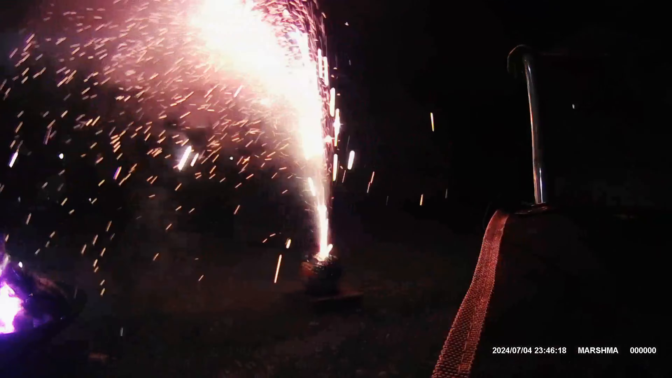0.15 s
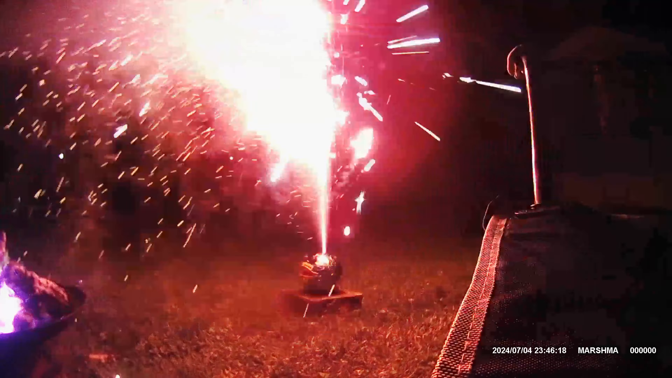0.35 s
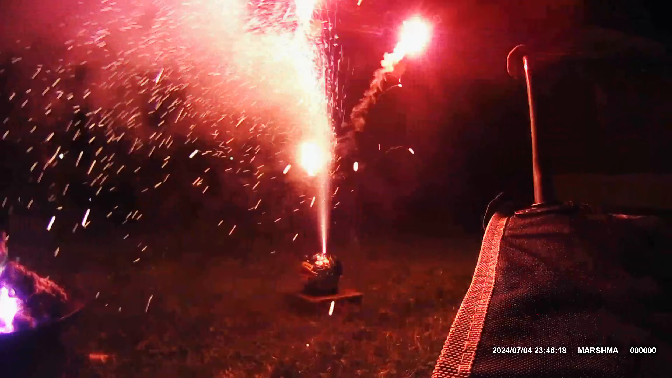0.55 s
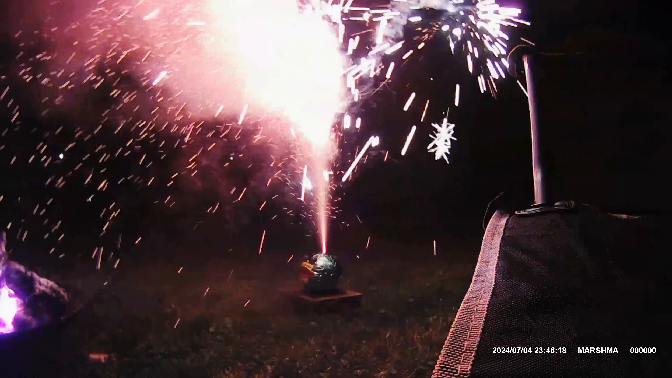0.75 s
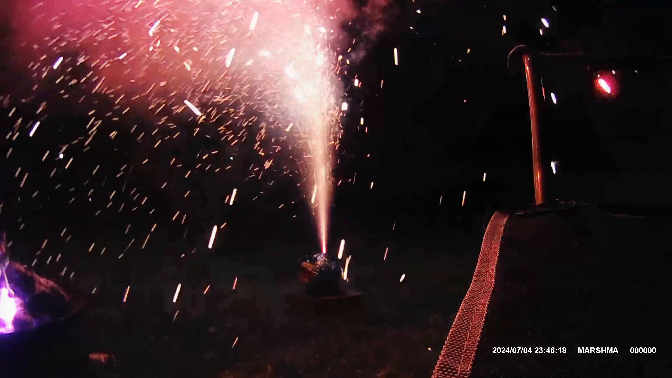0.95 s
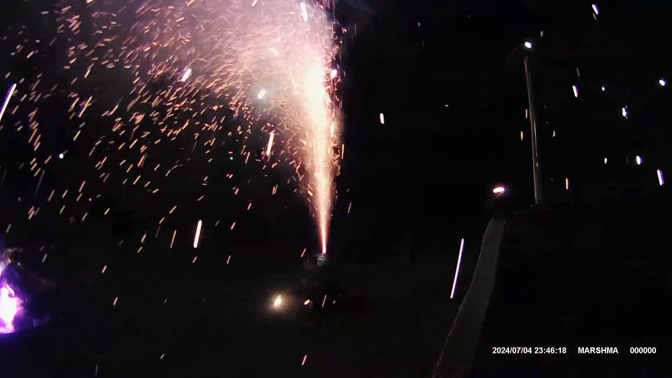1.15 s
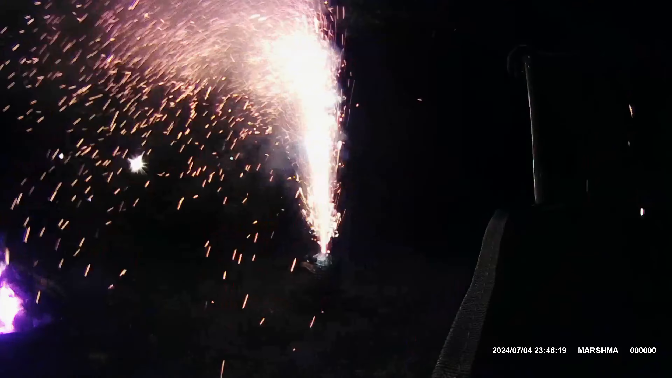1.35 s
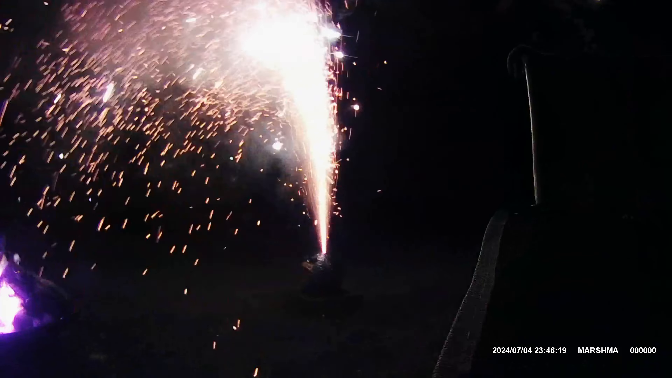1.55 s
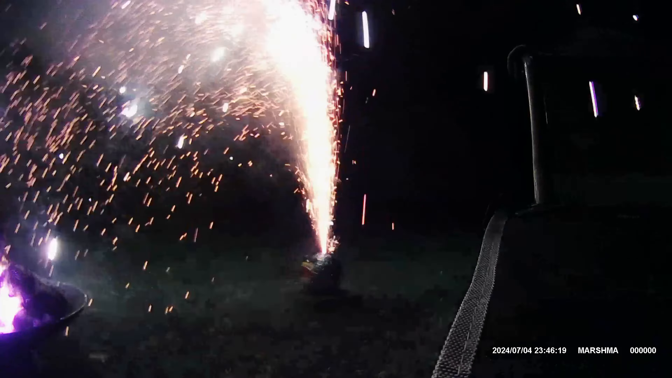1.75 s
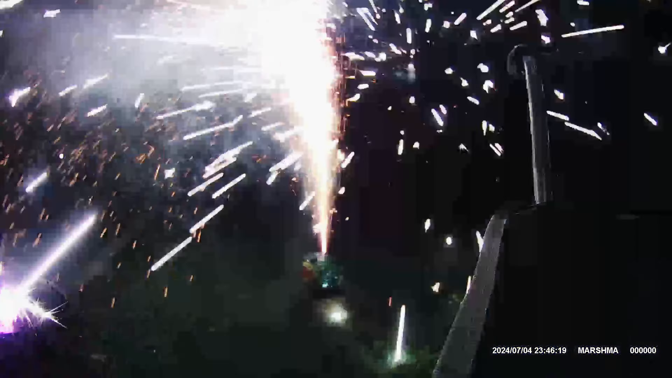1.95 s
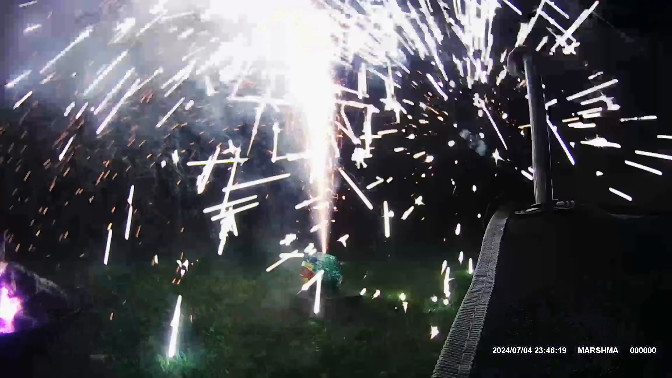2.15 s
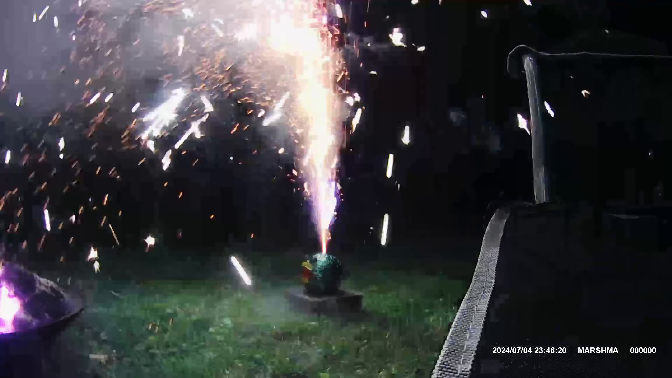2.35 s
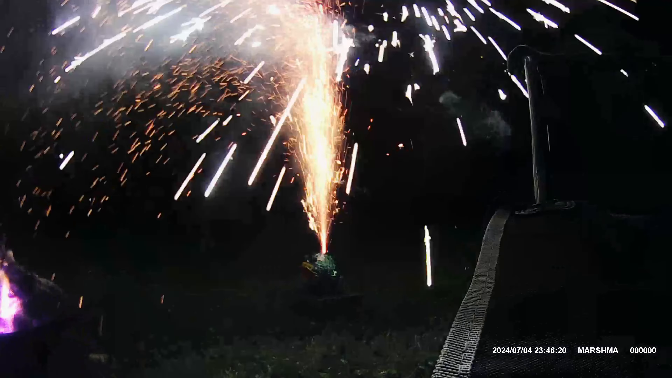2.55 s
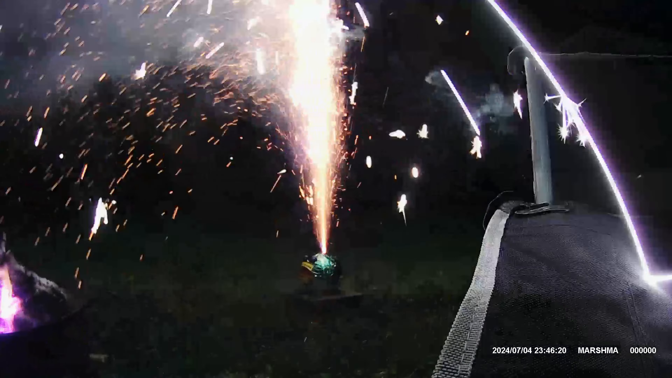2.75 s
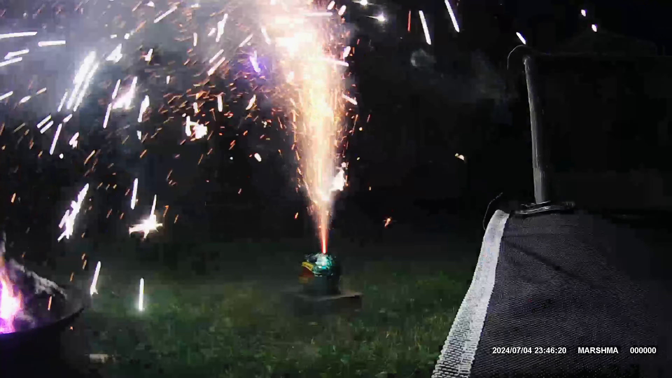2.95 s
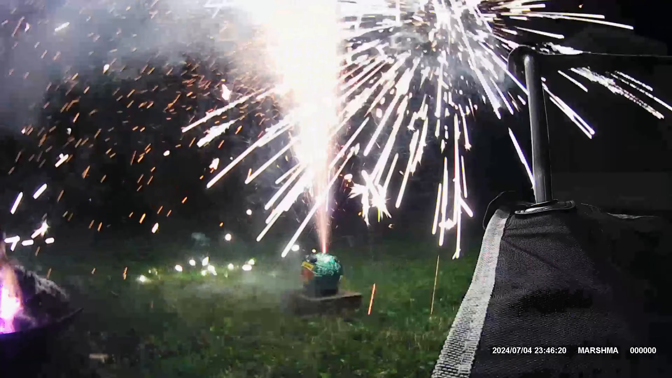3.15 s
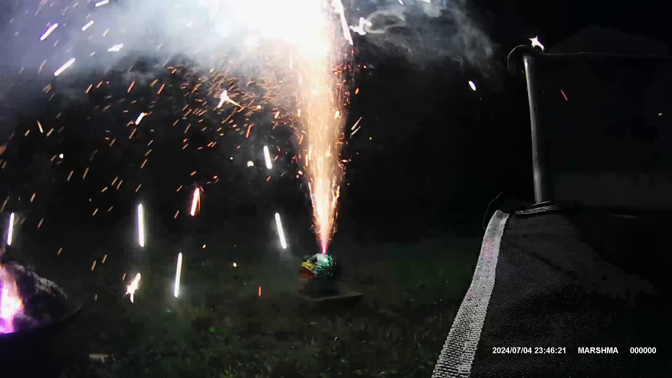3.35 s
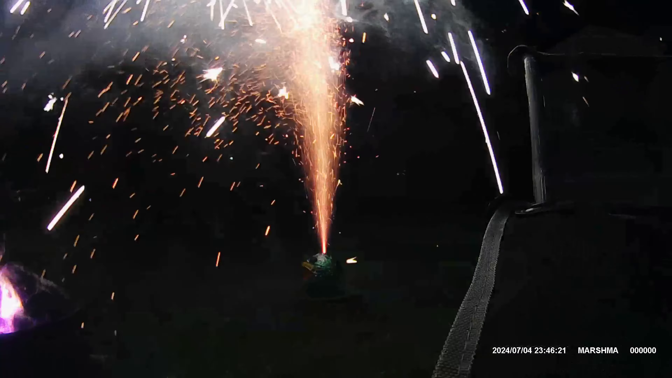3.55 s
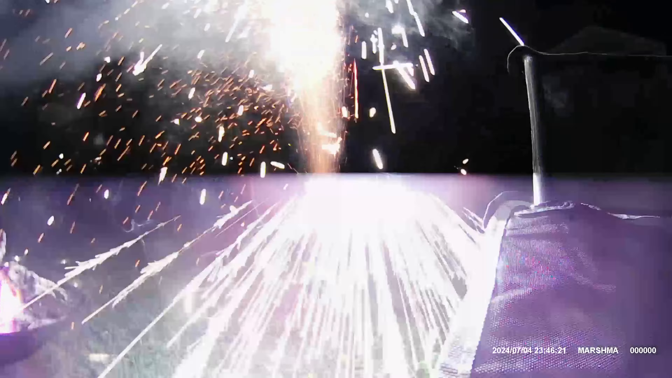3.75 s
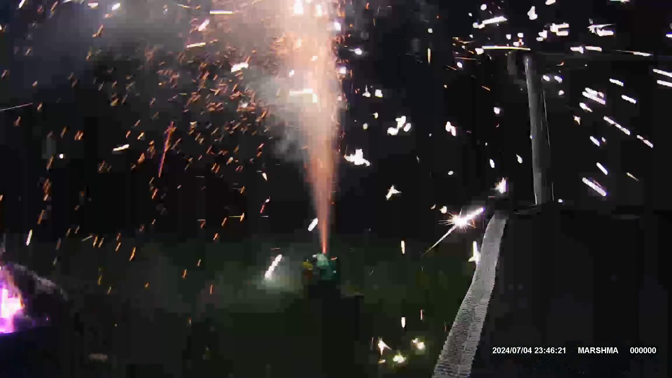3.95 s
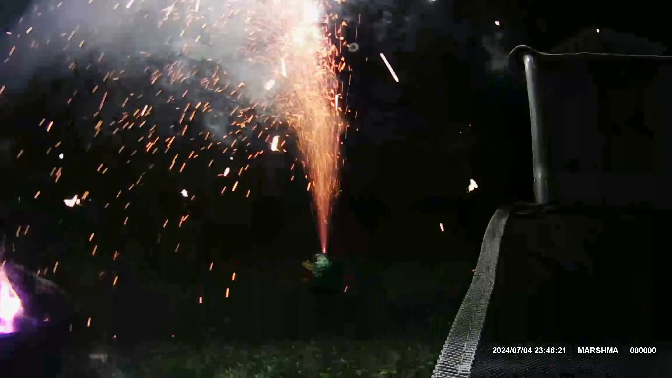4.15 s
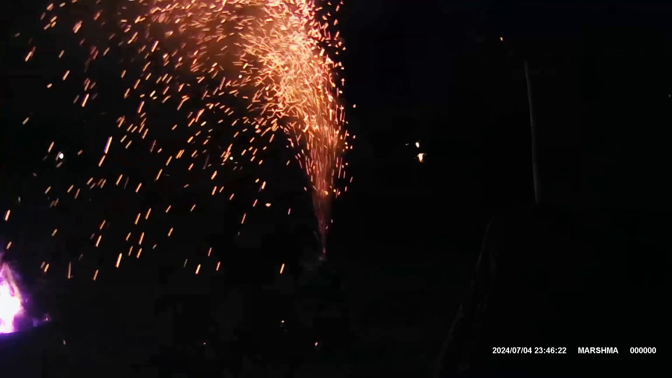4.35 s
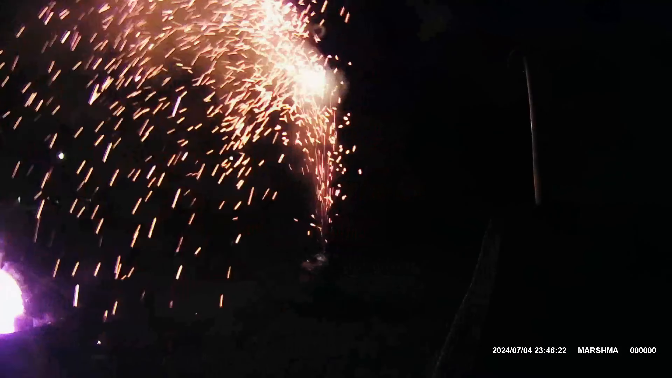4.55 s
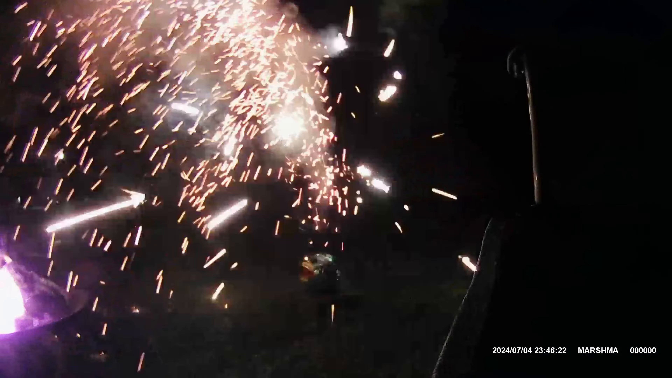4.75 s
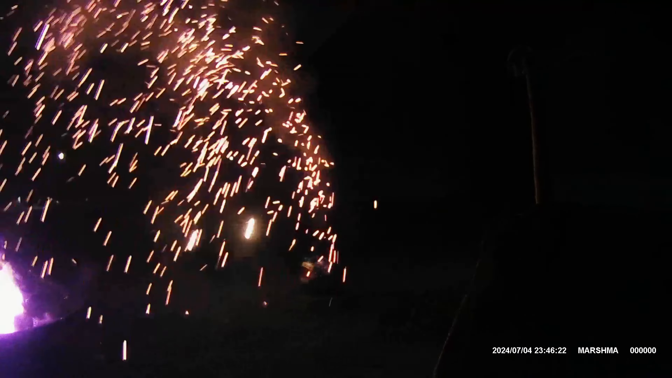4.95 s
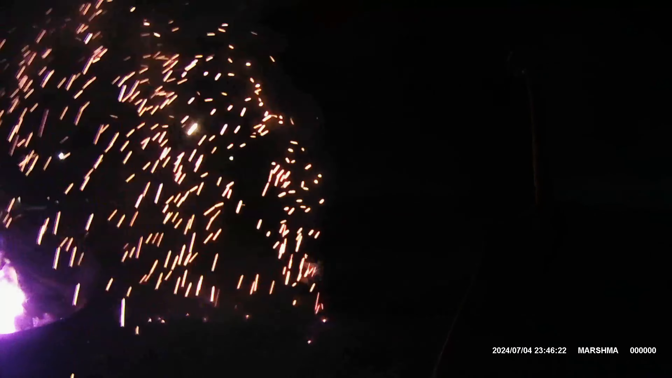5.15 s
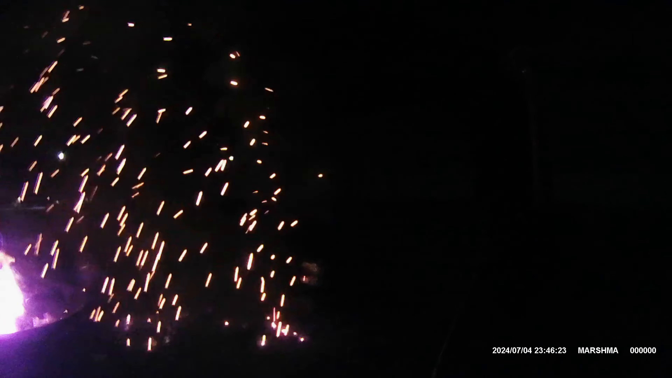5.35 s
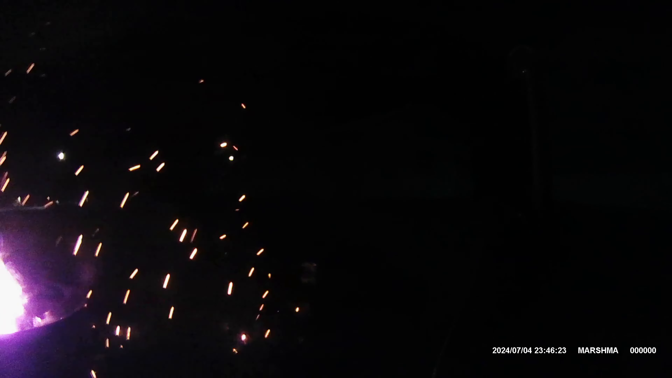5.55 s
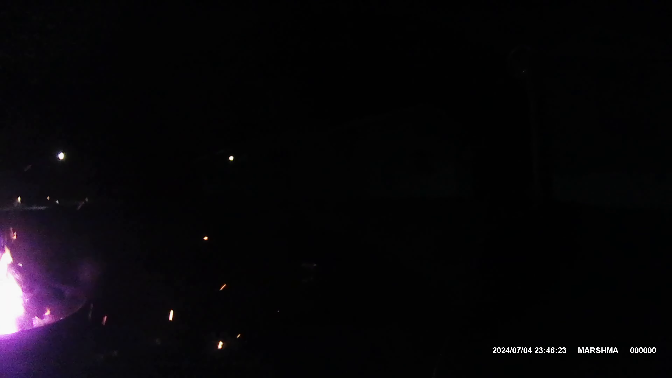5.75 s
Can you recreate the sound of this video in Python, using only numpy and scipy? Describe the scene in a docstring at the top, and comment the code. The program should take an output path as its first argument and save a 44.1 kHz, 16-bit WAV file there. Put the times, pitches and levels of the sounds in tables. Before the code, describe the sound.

A close, mono, overloaded camera microphone catches a firework fountain on a lawn. First come irregular dry cracks over a steady hiss, then dense, loud, distorted crackling with heavy punches. After about four seconds the bursts cease, the hiss collapses, a single weaker pop follows, and a thin high sizzle dies into quiet rumble.

```python
"""A ground fountain firework burns on a lawn at night: its stars open with N-shaped shocks and spit noise,
the nearest bursts add a suction that drives the microphone to its rail, and a turbulent hiss swells and dies.
Embers sizzle on as thin high noise after the hiss has sunk. Echoes die away over the garden as noise driven
by the power of the bursts, above a low lumpy rumble and an even hush. A small camera a few metres away
overloads, adds two faint throbbing tones and cuts the top treble."""
import sys
import numpy as np
from scipy import signal
from scipy.fft import rfft, irfft
from scipy.io import wavfile

SR = 44100
rng = np.random.default_rng(int(sys.argv[2]) if len(sys.argv) > 2 else 0)


def undo_db(level):
    """Turn decibels back into plain size, where 20 dB means ten times bigger."""
    steps = np.asarray(level, float) / 20
    return 10 ** steps


def dump_mix(stems):
    """Bounce the given channels to the path in sys.argv[1] as a 16-bit WAV at rate SR."""
    frames = np.atleast_2d(stems).T  # one column per channel
    limited = np.clip(frames, -1, 1)  # hard clip at full scale
    pcm = np.round(limited * 32767).astype(np.int16)
    wavfile.write(sys.argv[1], SR, pcm)


N = 260190   # length [samples]
MIC_RAIL = 2.67   # height at which the capsule limits, linear


def rms_one(x):
    """Normalisation: scales a signal to unit effective value."""
    return x / np.sqrt(np.mean(x ** 2) + 1e-20)


def butter(x, hz, kind, order=2):
    """Butterworth filtering: a maximally flat pass band."""
    return signal.sosfilt(signal.butter(order, hz, kind, fs=SR, output="sos"), x)


def drift(rate_hz):
    """Low-passed chance: two equal poles at rate_hz leave a slow wander of spread 1."""
    pole = np.exp(-80 * np.pi * rate_hz / SR)   # one step every 40 samples
    chance = rng.standard_normal(N // 40 + 2002)
    slow = signal.lfilter([1], [1, -2 * pole, pole * pole], chance)[2000:]
    return np.interp(np.arange(N) / 40, np.arange(len(slow)), rms_one(slow))


def coloured(spectrum):
    """Spectral shaping: white noise weighted along log frequency, with unit effective value."""
    hz, db = np.transpose(spectrum)
    grid = np.maximum(np.fft.rfftfreq(N, 1 / SR), 1)
    weight = undo_db(np.interp(np.log(grid), np.log(hz), db))
    return rms_one(irfft(rfft(rng.standard_normal(N)) * weight, N))


def dying(x, t60):
    """Exponential decay: values fall by a factor of 1000 in t60 [s]; a steady input keeps its height."""
    pole = undo_db(-60 / (t60 * SR))
    return signal.lfilter([1 - pole], [1, -pole], x + 1e-18)


def in_time(rows):
    """Linear interpolation: the columns of a curve, sample by sample."""
    s, *columns = np.transpose(rows)
    return [np.interp(np.arange(N) / SR, s, column) for column in columns]


# Crackling stars: (time [s], level [dB], time to burn down 6 dB [ms])
STAR_BURSTS = [(0.2069, 5.5, 2), (0.2192, -24, 6), (0.249, -10, 2), (0.257, -19, 5), (0.2927, -6, 1.84),
               (0.3703, -3, 4), (0.3941, -13.5, 3), (0.4493, -17, 2), (0.495, -23, 0.7),
               (0.577, -11.5, 1.8), (0.599, -22, 3.5), (0.6724, -21, 2.1), (0.7087, -17, 1.9),
               (0.7198, -22, 1.1), (0.7735, -7.5, 6.5), (0.7933, 8, 2), (0.831, -18.5, 1.1),
               (0.9219, -10, 1.86), (0.9842, -3.5, 1.5), (1.0113, -14.5, 2.5), (1.0675, -9.5, 1),
               (1.26, -22.5, 2.2), (1.4, -17, 2), (1.4049, -9, 1.8), (1.453, -20.5, 2.5),
               (1.4938, -24, 0.2), (1.6116, -6, 3.5), (1.6581, -16.5, 1.9), (1.7115, 10.5, 2),
               (1.792, -1.5, 5.5), (1.8146, -11.5, 6), (1.8245, 10, 5.5), (1.832, 7, 5.5), (1.9, 10, 9.5),
               (1.9368, 0, 6.5), (1.9733, -1, 5.0), (2.017, -14, 4.0), (2.027, -8.5, 5.5), (2.09, 0.5, 5.5),
               (2.1281, 3, 3), (2.137, -1.2, 4.5), (2.1465, -5, 1.5), (2.1819, 5, 2), (2.2413, 13, 2.5),
               (2.2613, 6, 2), (2.3052, -2, 10), (2.3192, -1, 5.5), (2.3353, 4.5, 3.5), (2.39, -9.5, 7.5),
               (2.3948, 11.5, 4.5), (2.4405, -16.5, 6), (2.4595, 9, 3.5), (2.5037, -13, 8.5),
               (2.5066, 9.5, 5.5), (2.568, -14.5, 1.8), (2.6058, -8.5, 3.5), (2.669, 14, 3),
               (2.706, 8.5, 3.5), (2.719, 6, 6), (2.731, 12, 2), (2.7771, -1.1, 8), (2.8045, 5, 4.5),
               (2.8146, 2.5, 5), (2.8248, -6, 5.5), (2.8403, 5.5, 2), (2.8714, 8, 2.5), (2.8875, 5, 9),
               (2.894, 2, 9), (2.9207, 3, 4.0), (2.948, -12, 0.1), (2.9794, 3.5, 1.8), (2.999, 3.5, 4),
               (3.013, 10.5, 7), (3.0799, 9.5, 4.5), (3.087, 1, 7.5), (3.106, -11, 2.4), (3.1268, 3, 8.5),
               (3.153, 11, 3.5), (3.1673, 7, 7.5), (3.1932, -7, 4.2), (3.247, 4.5, 7), (3.2514, 7.5, 1.5),
               (3.276, 9, 3.3), (3.3054, 4, 3.5), (3.3332, 5, 2.5), (3.359, 10, 8), (3.369, 1.5, 4.5),
               (3.386, 1.5, 5.5), (3.4111, -2.5, 4), (3.433, 15, 8.5), (3.4517, 6.5, 7), (3.469, -15, 0.5),
               (3.49, 6.5, 10), (3.5158, 3.5, 9), (3.546, 5.5, 4), (3.6115, 8, 4), (3.626, -15, 1),
               (3.6597, 2, 5), (3.6704, 5, 6), (3.6792, -5.5, 3.5), (3.7174, -9.5, 3.5), (3.7253, -2, 4),
               (3.737, 15.5, 3.5), (3.7627, 2.5, 6), (3.7834, -5, 2.3), (3.7905, -6.5, 4),
               (3.8058, 1.5, 0.6), (3.8233, 9, 4.5), (3.8676, 18.5, 4), (3.88, 4, 3), (3.9038, -1.5, 8),
               (3.9333, 7.5, 5.5), (3.9516, 7.5, 3.5), (3.9676, 10, 1.5), (3.979, 3, 5.5),
               (3.9948, 11.5, 2.5), (4.0508, 2.5, 5), (4.0671, 3, 2.5), (4.074, -5.5, 3.5),
               (4.086, -2, 4.5), (4.1022, 0.5, 5.0), (4.165, 1.5, 10.5), (4.208, -15, 11), (4.21, 15, 2.5),
               (4.254, -17, 2.5), (4.2783, -10.5, 1), (4.3113, -22.5, 4.5), (4.3203, -8, 1.1),
               (4.7119, -10.5, 2.5), (4.8241, -43, 1.6), (4.8694, -42, 1.45)]
# Muffled pops, mostly body: (time [s], level [dB], time to burn down 6 dB [ms])
MUFFLED_POPS = [(0.112, -35.5, 3.2), (0.1734, -19, 3.6), (0.585, -25.5, 3.1), (0.9875, -20, 1.9),
                (1.6114, -2, 2.3)]


def bursts():
    """Superposition: stars, pops and random splinters as rows of (s, level dB, burn ms, dull dB)."""
    s, level_db, burn_ms = np.transpose(STAR_BURSTS)
    # dull part of a star over its bright part: typical dB, dB per dB of level, chance spread dB
    typical_db, per_level_db, dull_spread_db = -8.5, -0.0232, 2
    dull_db = typical_db + per_level_db * level_db + dull_spread_db * rng.standard_normal(len(s))
    stars_rows = list(zip(s, level_db, burn_ms, dull_db))
    pops_rows = [(*pop, 6) for pop in MUFFLED_POPS]

    over_hiss_db, size_spread_db, snap_ms, snap_dull_db = 5, 3.5, .6, -2.5
    hiss_db, splinters_per_s = in_time(HISS_COURSE)
    snapped = np.flatnonzero(rng.random(N) < splinters_per_s / SR)
    sizes_db = hiss_db + over_hiss_db + size_spread_db * rng.standard_normal(N)
    splinters = [(i / SR, sizes_db[i], snap_ms, snap_dull_db) for i in snapped]
    return stars_rows + pops_rows + splinters


def spitting(length):
    """Random amplitude modulation: white noise whose level jumps every 12 samples, in one shared volley."""
    steps = undo_db(4 * rng.standard_normal(length // 12 + 1)).repeat(12)[:length]
    return lambda: steps * rng.standard_normal(length)


def stars(split_hz=2500, top_hz=14000):
    """N-wave and noise burst: a shock, then a spitting volley; each burst leaves a short fading tail."""
    burn_shape, tail_db, tail_t60_s = 1.81, -18, 0.056
    length = 8000   # of one burst [samples]
    out, t = np.zeros(N + length), np.arange(length) / SR
    spit = spitting(N)
    dull = rms_one(butter(spit(), [300, split_hz], "band"))
    bright = rms_one(butter(butter(spit(), top_hz, "low", order=1), split_hz, "high"))
    thin = rms_one(butter(spit(), [1700, 2900], "band"))
    dull, thin, bright = (np.pad(v, (0, length)) for v in (dull, thin, bright))
    for s, level_db, burn_ms, dull_db in bursts():
        burnt = t * 1000 / burn_ms
        shape = undo_db(-6 * burnt ** burn_shape) + undo_db(tail_db - 60 * t / tail_t60_s)
        wave_s = 0.00007 * undo_db(dull_db / 2)   # a duller star has a longer shock
        shock = undo_db(9) * (1 - 2 * t / wave_s) * (t < wave_s)
        at = slice(round(s * SR), round(s * SR) + length)
        body = thin if burn_ms < 1.75 else dull   # a brief snap is too small to make bass
        volley = bright[at] + undo_db(dull_db) * body[at]
        out[at] += undo_db(level_db) * (shock + shape * volley)
    return out[:N]


# Low pressure blows of near bursts, and two distant thumps at the end:
# (time [s], suction over the rail [dB])
PRESSURE_BLOWS = [(0.1142, -23.5), (0.1734, -12), (0.247, -22), (0.2753, -21.5), (0.393, -23),
                  (0.5863, -18.5), (0.6622, -21.5), (0.7087, -24.5), (0.7718, -12.5), (0.791, -19),
                  (0.988, -19.5), (1.4017, -22), (1.613, -12.5), (1.7104, -24), (1.8053, 28.5), (1.8284, 6),
                  (1.899, -0.5), (1.9366, 10.5), (1.9716, -11), (2.0224, 15.5), (2.091, -13.5),
                  (2.1253, 15), (2.1406, 12), (2.3034, 1.5), (2.393, 8), (2.4592, 0), (2.5997, 20.5),
                  (2.705, 1), (2.7748, -6.5), (2.888, -4), (2.9811, 14.5), (2.9966, 9), (3.081, -4.5),
                  (3.128, -3), (3.1469, 18), (3.1678, 4.5), (3.1897, 20.5), (3.3696, -3), (3.389, -0.5),
                  (3.4066, 10.5), (3.514, -0.5), (3.6099, -8), (3.6736, 8), (3.717, 10), (3.736, -7),
                  (3.7844, -3), (3.804, 5.5), (3.8672, -4.5), (3.933, 0.5), (4.0656, -5.5), (4.089, -6.5),
                  (4.2026, 17), (4.7127, -23), (5.359, -39), (5.711, -39)]


def blasts(release_db_per_ms=3.5, front_ms=.12, rise_ms=0.11):
    """Blast wave: a thin front, then fading suction; blows from further off are weaker and softer."""
    out, ms = np.zeros(N + 2000), np.arange(2000) / SR * 1000
    # every star gives a faint low blow, 27.5 dB below its level
    faint = [(s, level_db - 27.5) for s, level_db, burn_ms in STAR_BURSTS]
    for s, over_db in PRESSURE_BLOWS + faint:
        softening = undo_db(max(-over_db, 0) * .6)
        onset = 1 - np.exp(-ms / (rise_ms * softening))
        suction = undo_db(np.minimum(over_db - release_db_per_ms * ms, 12))   # at most 12 dB over the rail
        polarity = np.where(ms < front_ms, .3, -1)
        out[round(s * SR):][:2000] += MIC_RAIL * suction * onset * polarity
    return out[:N]


# Hiss of the jet and of the dense crackle, which swells and dies:
# (time [s], hiss level [dB], splinters [per s, none below 0])
HISS_COURSE = [(0.0, -34, 5), (0.43, -31, 6), (1.68, -31.5, 6), (1.99, -24, 45), (2.51, -26, 45),
               (2.86, -22, 45), (3.11, -24.5, 47), (3.38, -18, 45), (3.71, -24, 60), (4.03, -25, 59),
               (4.25, -27, 45), (4.33, -30.5, 0), (4.44, -51, 0), (4.98, -61.5, -1), (5.9, -77.5, 0)]
# Turbulent hiss: (frequency [Hz], relative spectral density [dB])
HISS_SPECTRUM = [(35, -49), (60, -11.5), (290, 0.5), (380, -0.5), (455, -3.5), (682, -3), (763, -11),
                 (1340, -12.5), (1920, 1.5), (3290, -4), (4830, -0.5), (6300, -2), (7410, -2.2),
                 (10400, -2.5), (13000, -9.5)]


def jet(size_db=6.5, flutter_db=1.5, sparks_per_s=150):
    """Turbulent noise: the fluttering hiss of jet and dense crackle, with small sparks snapping in it."""
    hiss = undo_db(flutter_db * drift(25.0)) * coloured(HISS_SPECTRUM)
    sizes = undo_db(size_db * np.minimum(rng.exponential(1, N), 4))
    born = (rng.random(N) < sparks_per_s / SR) * sizes
    snap_gain = SR * undo_db(-30) / 500
    snaps = snap_gain * dying(born, .012) * butter(rng.standard_normal(N), 900, "high")
    return undo_db(in_time(HISS_COURSE)[0]) * (hiss + snaps)


# Sizzle of the embers: (frequency [Hz], relative spectral density [dB])
EMBER_SPECTRUM = [(4000, -28), (7000, -12), (9500, 2), (12500, -1)]


def embers(start_s=4.5, level_db=-63, landed_s=5.3, t60_s=1.4):
    """Exponential decay: a thin high sizzle holds while embers fall, then fades once they land."""
    t = np.arange(N) / SR
    fade_db = -60 * np.maximum(t - landed_s, 0) / t60_s
    fade_in = np.clip((t - start_s) / .2, 0, 1)
    return fade_in * undo_db(level_db + fade_db) * coloured(EMBER_SPECTRUM)


# Scattered echoes: (frequency [Hz], relative spectral density [dB])
GARDEN_SPECTRUM = [(100, -17), (300, -4.5), (870, -9), (2400, 1.5), (3600, -2.5), (9900, -10.5),
                   (12500, -17.5)]


def garden(x, t60_s=1.15, gain_db=-29.5):
    """Diffuse reverberation: houses and trees scatter bursts into a wash that follows their power."""
    # halved, because a power value falls by only a factor of 1000 per 30 dB
    power = dying(dying(x ** 2, 0.057), t60_s / 2)
    return undo_db(gain_db) * np.sqrt(power) * coloured(GARDEN_SPECTRUM)


# Low night rumble: (frequency [Hz], relative spectral density [dB])
RUMBLE_SPECTRUM = [(30, 9.5), (110, 1.5), (160, -1.5), (247, -9.5), (443, -21), (900, -33.5), (3000, -71)]
# Even hush: (frequency [Hz], relative spectral density [dB])
HUSH_SPECTRUM = [(200, -1), (756, 8), (2000, -3.5), (4140, -12), (9500, -13), (12500, -9)]


def night(rumble_db=-52, hush_db=-69):
    """Stationary and modulated noise: a low, slightly lumpy rumble with an even hush."""
    lumps = undo_db(3.2 * drift(10))
    rumble = undo_db(rumble_db) * lumps * coloured(RUMBLE_SPECTRUM)
    return rumble + undo_db(hush_db) * coloured(HUSH_SPECTRUM)


def scene():
    """Linear superposition of all sources, as one channel."""
    crackle = stars()
    near = crackle + blasts() + jet() + embers()
    return (near + garden(crackle) + night())[None]


# Camera electronics: (frequency [Hz], peak level [dB], loudest point of the throb [0-1 of its period])
WHINE_TONES = [(4982, -76, .935), (12234, -78, .38)]


def whine(throbs_per_s=30.0):
    """Amplitude modulation: two faint tones swell and sink, changing sign at each null."""
    t = np.arange(N) / SR
    out = np.zeros(N)
    for hz, peak_db, loudest in WHINE_TONES:
        swing = np.cos(np.pi * (throbs_per_s * t - loudest))
        out += undo_db(peak_db) * swing * np.abs(swing) * np.sin(2 * np.pi * hz * t)
    return out


def roll_off(x):
    """The treble ends steeply here."""
    return signal.sosfilt(signal.butter(12, 13290, fs=SR, output="sos"), x)


def record(dry):
    """Saturation and filtering: the capsule limits, the coupling swings back, the converter clips."""
    coupling_hz, full_scale = 196, .68
    port_hz, port_width_hz, port_lift = 8000, 1700, .25
    railed = np.clip(dry, -MIC_RAIL, MIC_RAIL)
    # above its rail the capsule still passes some treble, weakened
    leak = undo_db(-9) * butter(dry - railed, 1500, "high")
    coupled = butter(railed + leak, coupling_hz, "high")
    clipped = np.clip(coupled + whine(), -full_scale, full_scale)
    # a broad treble peak, then a steep cut above it
    edges = [port_hz - port_width_hz / 2, port_hz + port_width_hz / 2]
    peak = port_lift * butter(clipped, edges, "band", order=1)
    lifted = (clipped + peak) / (1 + port_lift / 2)
    softened = butter(lifted, 13000, "low")
    steep = signal.cheby2(16, 40, 13150, fs=SR, output="sos")
    finished = signal.sosfiltfilt(steep, softened)
    return roll_off(finished)


dry = scene()
out = record(dry)
dump_mix(out)
```